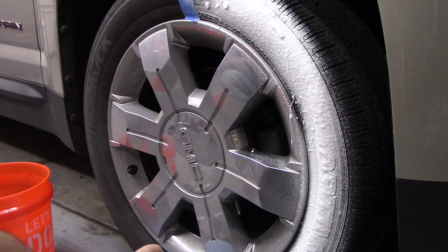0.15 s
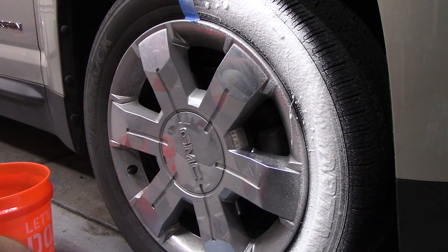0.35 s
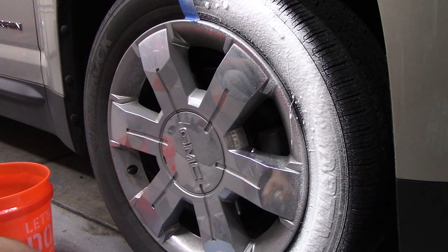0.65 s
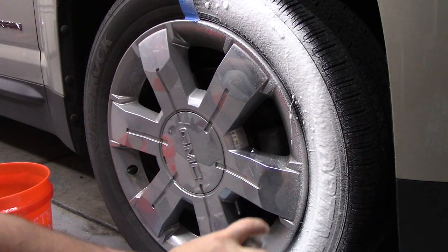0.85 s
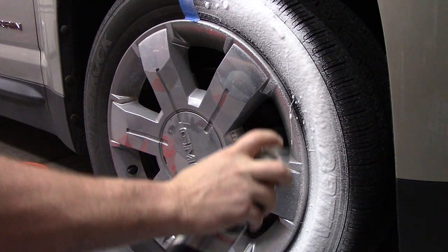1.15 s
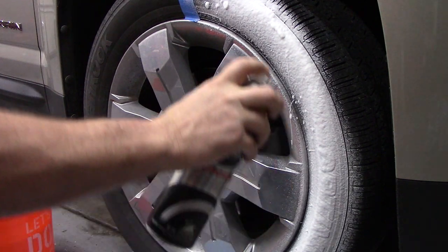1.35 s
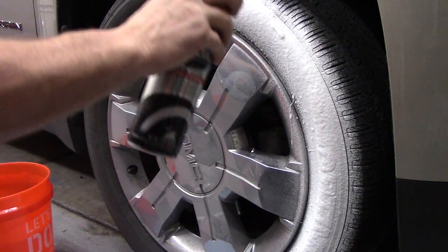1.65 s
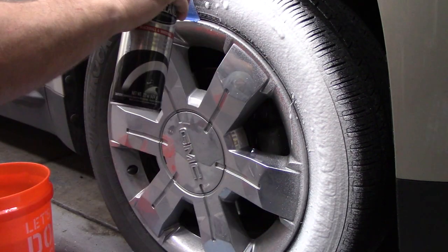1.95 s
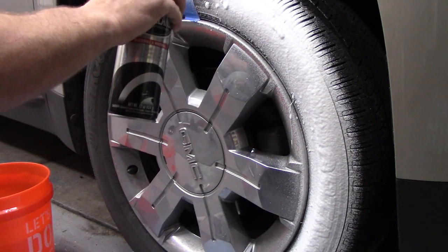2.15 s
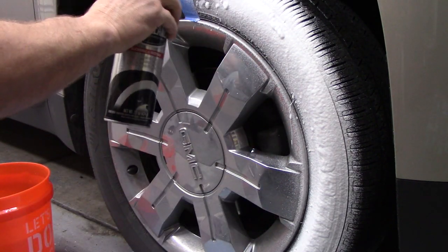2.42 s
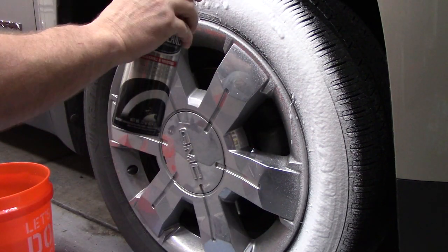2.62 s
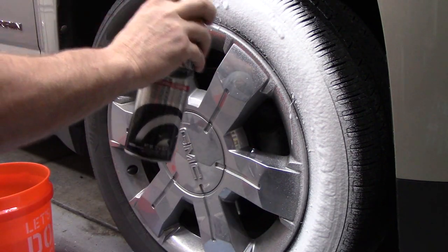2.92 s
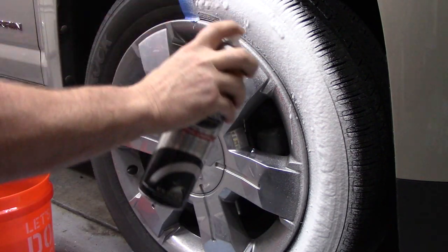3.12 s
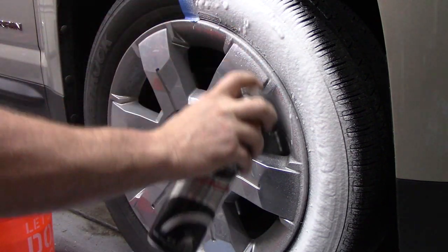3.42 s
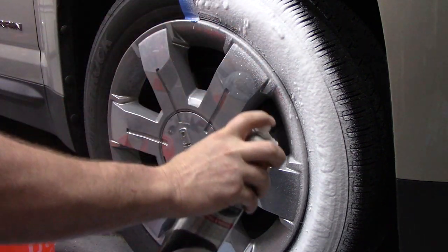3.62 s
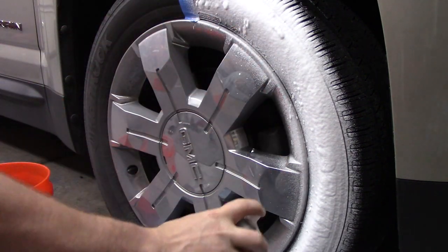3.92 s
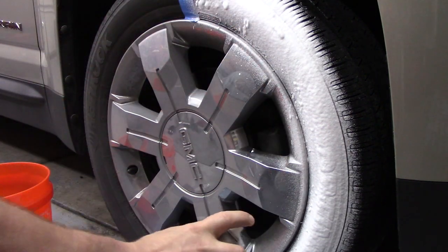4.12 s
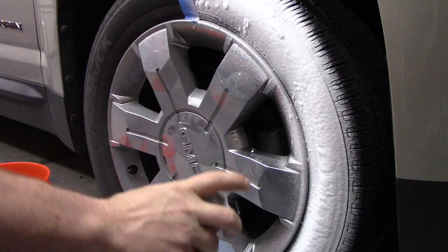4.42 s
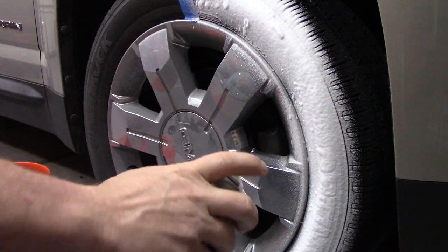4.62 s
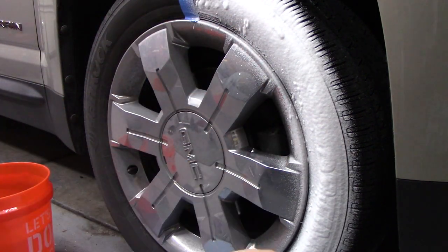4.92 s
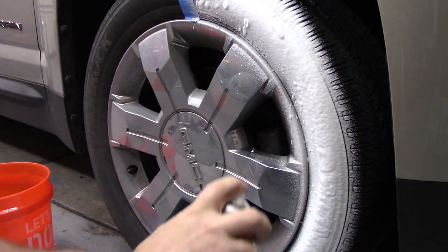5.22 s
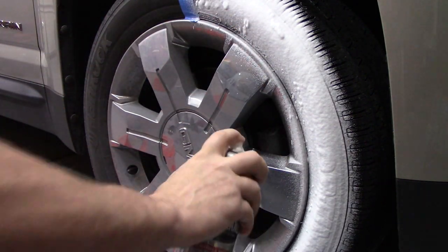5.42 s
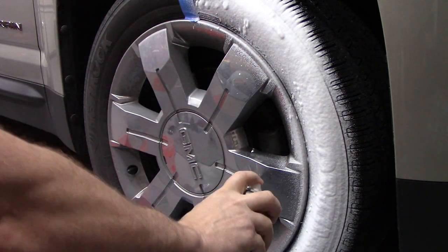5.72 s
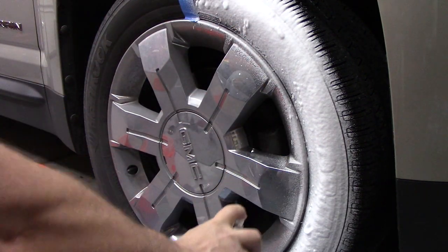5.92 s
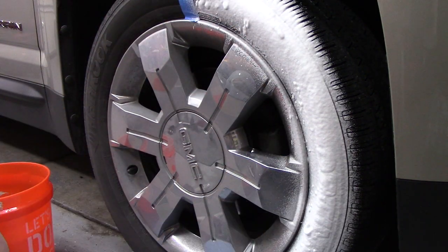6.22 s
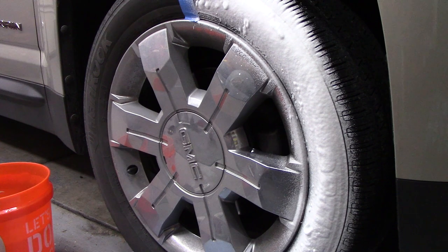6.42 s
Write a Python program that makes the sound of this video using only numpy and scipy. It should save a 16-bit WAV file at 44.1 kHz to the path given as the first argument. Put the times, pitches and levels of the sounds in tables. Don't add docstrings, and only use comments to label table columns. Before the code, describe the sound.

An aerosol can sprays a tire with one long loud hiss, then short puffs, with cloth rustle, can knocks and low hum in a garage.

```python
import sys
import numpy as np
from scipy import signal
from scipy.io import wavfile
from scipy.ndimage import uniform_filter1d

SR = 44100
rng = np.random.default_rng(int(sys.argv[2]) if len(sys.argv) > 2 else 0)


def attenuation_scalar(level_db):
    decades = np.asarray(level_db, float) / 20
    return 10 ** decades


def unload_audio(sound):
    columns = np.transpose(np.atleast_2d(sound))
    steps = np.round(np.clip(columns, -1, 1) * 32767)
    wavfile.write(sys.argv[1], SR, steps.astype(np.int16))


N = 289296
T = np.arange(N) / SR
FRAME = 256

# opening_start_s, opening_time_s, shutting_start_s, shutting_time_s, swell_db
VALVE_MOTION = [
    (0.299, 0.023, 1.91, .02, 0.1),
    (2.404, .03, 2.529, 0.016, 6),
    (2.95, 0.033, 3.122, 0.0063, -1),
    (3.369, 0.019, 3.542, 0.016, 0),
    (3.728, .012, 3.887, 0.042, -1.5),
    (5.773, 0.036, 5.91, 0.034, -1),
]
# frequency_hz, density_db
NOZZLE_SPECTRUM = [(1500, -18), (2500, 0.5), (5000, -0.5), (7000, 0.5), (8200, -3.5), (10000, -2),
                   (11500, -7), (13500, -13.5), (15700, -24)]
# frequency_hz, density_db
ROAR_SPECTRUM = [(250, -22), (500, -10.5), (1000, -5), (1800, 0.5), (3000, -3.5), (5000, -43.5)]
# frequency_hz, level_db
SPLASH_TOP_SPECTRUM = [(100, 0.5), (5800, -2.5), (6800, -11), (8200, -15), (16000, -36)]
# time_s, hiss_db, splash_db, edge_hz, slope_db_per_octave
ARM_SWEEP = [
    (.335, -44.5, -34.5, 2370, -1.5),
    (.42, -38.5, -51, 2400, .1),
    (.63, -43, -38, 4900, 4),
    (.87, -41.5, -27.5, 3560, .6),
    (1.07, -43.5, -24.5, 2700, .6),
    (1.34, -39, -27.5, 3450, .6),
    (1.48, -39.5, -26, 2780, -3.5),
    (1.74, -40, -31, 3240, -2.5),
    (1.9, -41.5, -29, 3450, 1.5),
]
# hiss_db, splash_db, roar_db, edge_hz, slope_db_per_octave
PUFF_AIM = [
    (-40.5, -34, -47.5, 3730, 4),
    (-41.5, -25.5, -45, 3050, -4.5),
    (-42.5, -26.5, -45.5, 2480, 0.1),
    (-43, -26.5, -46.5, 2340, -7),
    (-45, -33, -46.5, 1680, -0.7),
]
# pitch_hz, level_db
VALVE_SONG = [(1712, -50.5), (2568, -49), (3225, -51.5), (4059, -45), (4479, -52), (4980, -51), (5545, -46),
              (5868, -45), (6105, -49), (6928, -49), (7445, -39), (8651, -46), (9851, -52), (10304, -48)]
# middle_s, half_length_s
SONG_MOMENT = (2.477, 0.014)
# frequency_hz, change_db
CHOKED_HISS = [(1400, -24), (2000, -14), (4500, -10), (6500, -13), (9000, -15), (12000, -8)]
# loudest_s, level_db, rise_s, fall_s
SLEEVE_STROKES = [(.2, -63, .1, 0.085), (2.27, -75, .06, .05), (4.2, -64, .1, .1), (4.35, -55, 0.11, .05),
                  (4.415, -51, 0.064, 0.032), (4.52, -58, 0.034, .06), (4.62, -53, 0.087, 0.11),
                  (4.71, -62, .08, 0.09), (4.88, -58.5, .07, .16), (5.05, -58, .16, .06),
                  (5.2, -62.5, .04, 0.18), (5.32, -65, .08, .08), (5.44, -62, 0.076, .05),
                  (5.55, -66, .06, 0.071), (5.655, -59, .012, .04), (5.725, -58, .012, .04),
                  (6.06, -59, 0.045, 0.032), (6.2, -57.5, .07, 0.064)]
# frequency_hz, density_db
SLEEVE_SPECTRUM = [(800, -11), (1500, -5.5), (3000, -5.5), (5400, -1.5), (7000, -9), (10000, -16.5),
                   (13000, -23), (15700, -36.5)]
# loudest_s, level_db, rise_s, fall_s
BODY_SHIFTS = [(.27, -63, .03, 0.036), (2.35, -67, .05, 0.049), (4.16, -60, .06, .04),
               (4.33, -59, .06, .03), (4.41, -52.5, .03, .05), (4.55, -56, .06, .12), (5.04, -62, .05, .05),
               (5.19, -53.5, .05, .1), (5.3, -55, .1, .1), (5.41, -53, .08, .08), (5.53, -59, .1, .1),
               (5.6, -58, .05, .05), (5.66, -52, .015, .05), (5.73, -49, .02, .05),
               (6.07, -56.5, .02, .025), (6.2, -61, .05, .05)]
# frequency_hz, density_db
BODY_SPECTRUM = [(82, -30), (140, -3), (329, -7), (408, -9.5), (625, -12), (681, -14.5), (1800, -22),
                 (2340, -51), (3960, -120)]
# start_s, peak_db, low_edge_hz, high_edge_hz, t60_s
CAN_TICKS = [(4.062, -51, 9100, 14500, 0.0315), (4.071, -49, 1500, 5960, 0.014),
             (4.1024, -46.5, 3300, 6500, 0.015), (4.1487, -43, 2160, 5000, 0.0207),
             (4.15, -55, 5000, 11000, 0.012), (4.397, -42, 500, 2400, 0.045),
             (4.419, -52, 3000, 12000, .04), (4.58, -48, 1093, 1900, .05), (5.169, -40, 750, 3000, 0.028),
             (5.172, -57, 5500, 7000, .03), (5.194, -48.5, 694, 2800, 0.15),
             (5.375, -48.5, 1000, 5440, 0.069), (5.592, -58, 500, 2000, .05),
             (5.6464, -45, 3320, 6100, 0.037), (5.648, -50, 890, 3000, .06),
             (5.715, -36.5, 790, 3680, 0.07), (5.7155, -50, 3800, 6960, 0.0304),
             (6.097, -57, 1500, 2100, 0.065), (6.262, -44.5, 1780, 6951, 0.019),
             (6.2625, -58, 7000, 12100, .02)]
# start_s, level_db
CAN_KNOCKS = [
    (4.071, -56),
    (4.397, -56),
    (4.419, -56),
    (5.194, -48),
    (5.375, -42),
    (5.592, -53),
    (5.6464, -44),
    (5.715, -39.5),
    (6.262, -60),
]
# pitch_hz, level_db, t60_s
CAN_MODES = [(258, -1, 0.17), (431, -1, 0.23), (532, 5.5, 0.064), (604, 1, 0.055)]
# pitch_hz, level_db, t60_s
THUD_MODES = [(149.5, -2.5, 0.21), (185, -2, 0.12), (258, -6, 0.11), (331, -8.5, 0.095), (455, -7, 0.095),
              (592, -6.5, 0.079), (973, -7, 0.055)]
# start_s, length_s, pitch_hz, level_db
BIRD_PEEPS = [(2.1, .04, 2700, -70), (2.208, 0.097, 3010, -62.5), (2.27, 0.082, 2570, -65.5),
              (2.22, .05, 2560, -69), (2.404, .015, 2634, -48.5), (2.8, 0.077, 3060, -73),
              (4.155, 0.085, 1596, -63), (4.21, .08, 1630, -63), (4.26, 0.09, 1574, -63),
              (4.394, .014, 960, -45.5), (6.36, 0.0355, 2500, -66), (6.41, 0.035, 3200, -68.5)]
# frequency_hz, t60_s
GARAGE_DECAY = [(500, 0.36), (1300, 0.37), (2500, .34), (3500, 0.3), (4600, 0.39), (6000, 0.34),
                (9200, 0.28), (15000, 0.24)]
# frequency_hz, level_db
GARAGE_STRENGTH = [(500, -2), (1200, -6), (1900, -4.5), (3200, -2), (5200, -2), (7000, -2), (10000, -4),
                   (16000, -8)]
# frequency_hz, density_db
FLOOR_SPECTRUM = [(12, -30), (22, -6.5), (60, -7), (119, -9), (150, -13), (233, -16.5), (316, -21),
                  (750, -26.5), (1350, -32), (2200, -31.5), (3600, -34.5), (5500, -35), (9000, -40.5),
                  (15700, -46)]
# pitch_hz, width_hz, level_db
MAINS_HUM = [(58.3, 7, -63.5), (119, 7.6, -58.5)]


def spray():
    hz, t = grid(FRAME)
    f = hz[:, 0]
    hiss_db, splash_db, roar_db, edge_hz, slope = jet_controls(t)
    octaves = np.log2((hz + 1) / edge_hz)
    band_db = octaves * np.where(octaves < 0, 37.5, slope) + read(SPLASH_TOP_SPECTRUM, hz)
    ridge_db = 0.3 - 0.6 * slope
    band_db = band_db + ridge_db * np.exp(-((octaves - .1) / 0.16) ** 2)
    hiss = attenuation_scalar(hiss_db) * shape(read(NOZZLE_SPECTRUM, hz), f, 8500, 15000)
    splash = attenuation_scalar(splash_db - 0.5) * shape(band_db, f, 2000, 6160)
    roar = attenuation_scalar(roar_db + 1.0) * shape(read(ROAR_SPECTRUM, hz), f, 600, 1800)
    middle_s, half_s = SONG_MOMENT
    choke = attenuation_scalar(read(CHOKED_HISS, hz) * np.exp(-((t - middle_s) / half_s) ** 4))
    gain = np.sqrt(hiss ** 2 + splash ** 2 + roar ** 2) * choke
    jet = noise(gain, FRAME, patchy_db=0.95, flicker_db=0.44)
    valve = np.zeros(N)
    for open_s, up_s, shut_s, down_s, _ in VALVE_MOTION:
        opening = np.clip((T - open_s) / up_s, 0, 1) ** 1.74
        valve += opening * np.clip(1 - (T - shut_s) / down_s, 0, 1) ** 2
    return jet * valve + valve_song()


def jet_controls(t):
    opens, _, shuts, _, swell_db = np.transpose(VALVE_MOTION)
    burst = np.maximum(np.searchsorted(opens - .05, t) - 1, 0)
    s, *columns = np.transpose(ARM_SWEEP)
    hiss, splash, edge, slope = [np.interp(t, s, column) for column in columns]
    sweep = [hiss, splash, -48.5 + 0 * t, edge, slope]
    aims = np.transpose(PUFF_AIM)[:, burst - 1]
    hiss_db, splash_db, roar_db, edge_hz, slope = np.where(burst == 0, sweep, aims)
    puff = burst > 0
    age_s = np.maximum(t - opens[burst], 0)
    through = np.minimum(age_s / (shuts - opens)[burst], 1) - .5
    swell = swell_db[burst] * through
    edge_hz = edge_hz * 2 ** (-0.16 * through * puff)
    splash_db = splash_db + swell - 5 * np.exp(-(age_s / 0.025) ** 2 / 2)
    stops = np.clip(1 + (t - shuts[burst]) / 0.015, 0, 2)
    hiss_db = hiss_db + .5 * swell - 3 * stops
    slope = slope * (1 - 0.7 * puff * (through + .5) ** 2)
    return hiss_db, splash_db, roar_db - 6 * stops, edge_hz, slope


def valve_song():
    song = np.zeros(N)
    middle_s, half_s = SONG_MOMENT
    near = T[:3000] - 1500 / SR
    for hz, db in VALVE_SONG:
        unsteady = 3.8 * uniform_filter1d(rng.standard_normal(len(near)), size=200)
        swell = np.exp(-((near - rng.uniform(-0.0048, 0.0067)) / half_s) ** 2)
        tone = np.sin(2 * np.pi * (hz * near + rng.random()) + unsteady)
        add(song, middle_s + near[0], attenuation_scalar(db + 5.0) * swell * tone)
    return song


def rustle():
    hz, t = grid(FRAME * 2)
    f = hz[:, 0]
    swish_db = strokes_db(SLEEVE_STROKES, t)
    bright = 0.33 * np.maximum(swish_db + 60.5, -10)
    colour_db = read(SLEEVE_SPECTRUM, hz) + bright * np.log2(np.clip(hz, 1500, 16000) / 5000)
    swish = attenuation_scalar(swish_db) * shape(colour_db, f, 3000, 9000)
    shuffle = attenuation_scalar(strokes_db(BODY_SHIFTS, t)) * shape(read(BODY_SPECTRUM, hz), f, 150, 800)
    return noise(np.sqrt(swish ** 2 + shuffle ** 2), FRAME * 2, patchy_db=1.5, flicker_db=1.5)


def strokes_db(rows, t):
    power = 0
    for s, db, rise_s, fall_s in rows:
        away = np.where(t < s, (s - t) / rise_s, (t - s) / fall_s)
        power = power + attenuation_scalar(db - 9 * away ** 1.3) ** 2
    return 10 * np.log10(power + 1e-12)


def ticks():
    out, t = np.zeros(N), T[:8000]
    for s, db, lo_hz, hi_hz, t60 in CAN_TICKS:
        band = signal.butter(3, [lo_hz, hi_hz], "band", fs=SR, output="sos")
        snap = attenuation_scalar(-60 * t / t60)
        scrape = attenuation_scalar(-18.5 - 60 * t / (5.4 * t60))
        drive = rng.standard_normal(len(t)) * (snap + scrape) * np.minimum(t / .0005, 1)
        crack = signal.sosfilt(band, drive) * np.sqrt(SR / 2 / (hi_hz - lo_hz))
        add(out, s, attenuation_scalar(db - 4.5) * crack)
    for s, db in CAN_KNOCKS:
        add(out, s, attenuation_scalar(db - 6.5) * rings(CAN_MODES, t))
    add(out, 0.359, attenuation_scalar(-36.5) * rings(THUD_MODES, t))
    return out


def rings(modes, t):
    out = 0
    for hz, db, t60 in modes:
        swell = np.minimum(t * hz / 0.71, 1)
        tone = np.sin(2 * np.pi * hz * rng.uniform(0.94, 1.05) * t)
        out = out + attenuation_scalar(db - 60 * t / t60) * swell * tone
    return out


def bird():
    out = np.zeros(N)
    for s, length_s, hz, db in BIRD_PEEPS:
        n = round(length_s * SR)
        waver = 1 + 0.12 * uniform_filter1d(rng.standard_normal(SR // 4), size=300)[:n]
        tremble_db = 40 * uniform_filter1d(rng.standard_normal(SR // 4), size=200)[:n]
        tone = np.sin(2 * np.pi * np.cumsum(hz * waver) / SR)
        add(out, s, attenuation_scalar(db - 1.5 + tremble_db) * np.hanning(n) * tone)
    return out


def garage(x):
    out, at = 0, np.arange(300, SR // 2, 20)
    for k in range(3):
        taps = np.zeros(SR // 2 + 20)
        taps[at + rng.integers(0, 20, len(at))] = rng.choice([-1., 1.], len(at))
        hz, t, z = signal.stft(taps, SR, nperseg=FRAME)
        decay_db = 60 * t / read(GARAGE_DECAY, hz)[:, None]
        gain = attenuation_scalar(read(GARAGE_STRENGTH, hz)[:, None] - decay_db)
        tail = signal.istft(z * gain, SR, nperseg=FRAME)[1]
        turn = np.sqrt(2 / 3) * np.cos(np.pi * (67 * T + k / 3))
        out = out + signal.oaconvolve(x * turn, tail / np.linalg.norm(tail))[:N]
    return out


def floor():
    size = FRAME * 16
    hz, t = grid(size)
    f = hz[:, 0]
    power = attenuation_scalar(-56) ** 2 * shape(read(FLOOR_SPECTRUM, hz), f, 20, 16000) ** 2
    for hum_hz, width_hz, db in MAINS_HUM:
        peak_db = -3 * np.minimum(abs(hz - hum_hz) / width_hz, 6) ** 2
        power = power + attenuation_scalar(db) ** 2 * shape(peak_db, f, 20, 300) ** 2
    gain = np.sqrt(power) * np.ones(len(t))
    return attenuation_scalar(2.5) * noise(gain, size, patchy_db=-0.38, flicker_db=0.63)


def noise(gain, size, patchy_db, flicker_db):
    a, b, patches = rng.standard_normal(gain.shape[::-1] + (3,)).T
    patches = uniform_filter1d(patches, size=4, axis=0)
    patches = evened(uniform_filter1d(patches, size=24, axis=1))
    flicker = evened(uniform_filter1d(rng.standard_normal(gain.shape[1]), size=6))
    z = (a + 1j * b) * gain * attenuation_scalar(patchy_db * patches + flicker_db * flicker)
    return signal.istft(z, nperseg=size, noverlap=size * 3 // 4)[1][:N] * np.sqrt(2 / 3)


def grid(size):
    return np.fft.rfftfreq(size, 1 / SR)[:, None], np.arange(N * 4 // size + 5) * size / 4 / SR


def shape(db, hz, lo_hz, hi_hz):
    gain = attenuation_scalar(db)
    inside = (hz >= lo_hz) & (hz < hi_hz)
    return gain / np.sqrt((gain[inside] ** 2).sum(axis=0))


def read(points, hz):
    f, value = np.transpose(points)
    return np.interp(np.log(hz + 1), np.log(f + 1), value)


def evened(x):
    return x / np.sqrt(np.mean(x ** 2) + 1e-20)


def add(mix, s, sound):
    part = mix[round(s * SR):][:len(sound)]
    part += sound[:len(part)]


def scene():
    jet, small = spray(), ticks() + bird()
    echo = garage(attenuation_scalar(-10) * jet + attenuation_scalar(-7.5) * small)
    mono = attenuation_scalar(1.5) * jet + echo + small + rustle() + floor()
    return np.array([mono, mono])


def top_cut(x):
    return signal.sosfilt(signal.butter(12, 15820, fs=SR, output="sos"), x)


def record(dry):
    white = rng.standard_normal(N)
    bass = evened(signal.lfilter([1], [1, -.9], white))
    side = attenuation_scalar(-85) * white + attenuation_scalar(-87.5) * bass
    lowpass = signal.firwin(301, 15750, fs=SR)[None]
    mix = signal.oaconvolve(dry + np.array([side, -side]), lowpass, "same")
    return top_cut(mix)


dry = scene()
out = record(dry)
unload_audio(out)
```